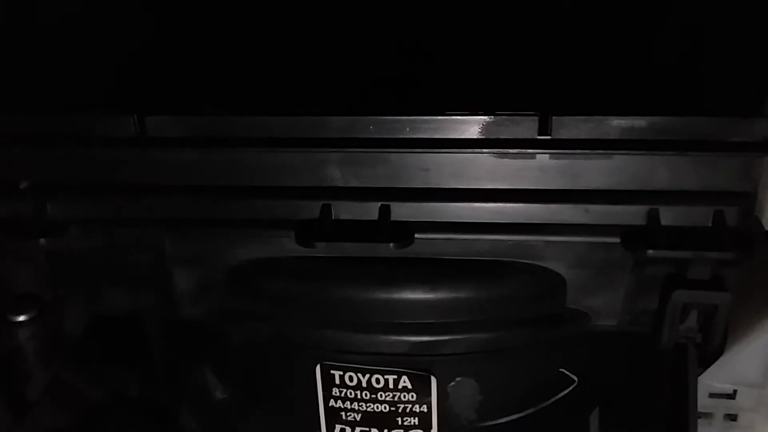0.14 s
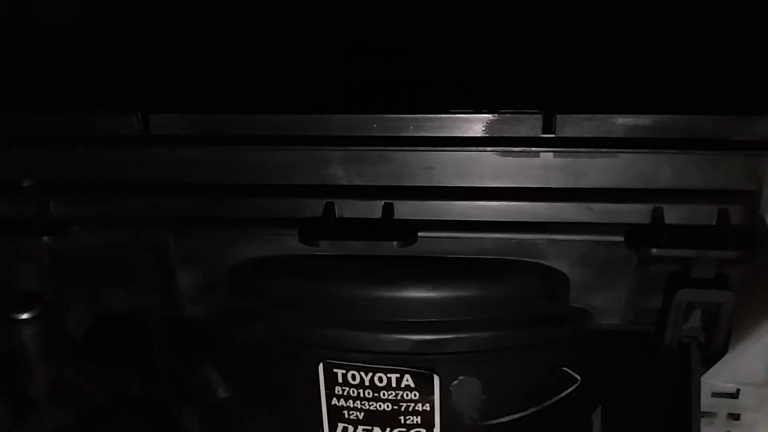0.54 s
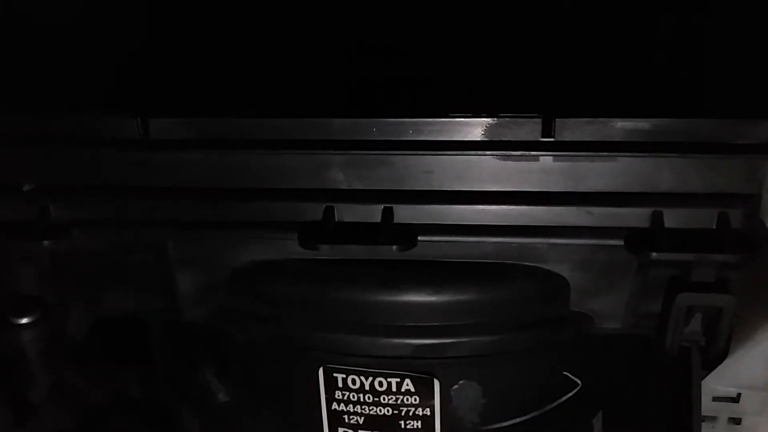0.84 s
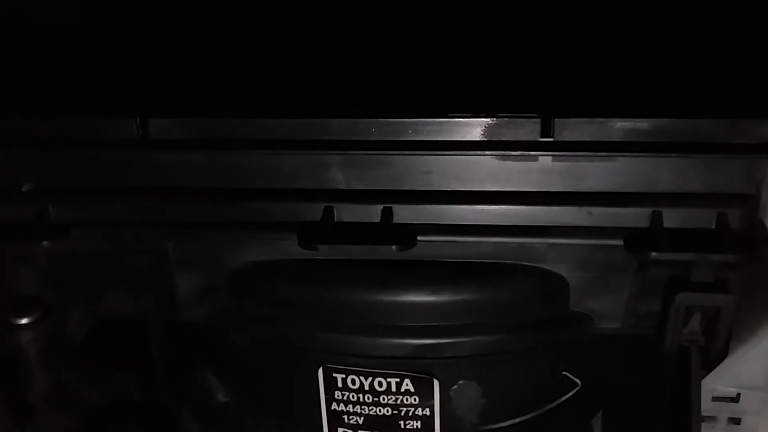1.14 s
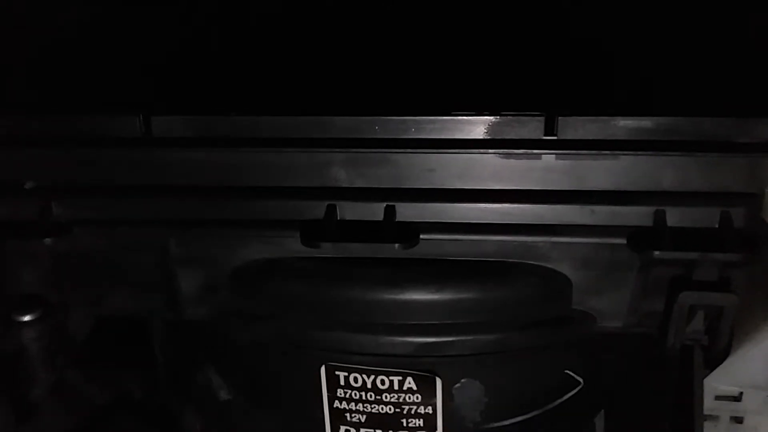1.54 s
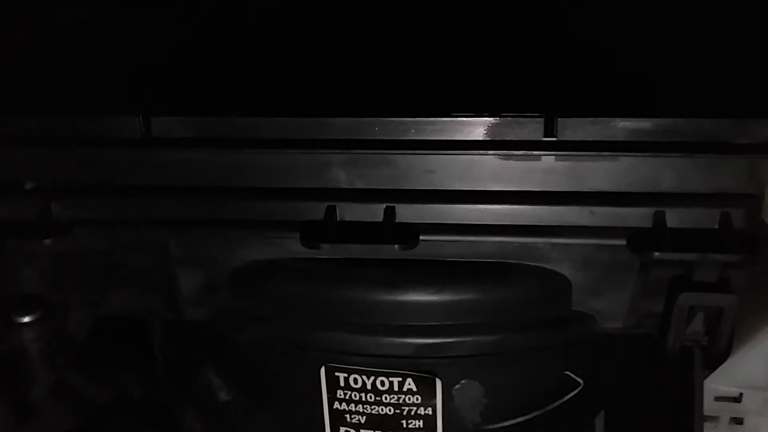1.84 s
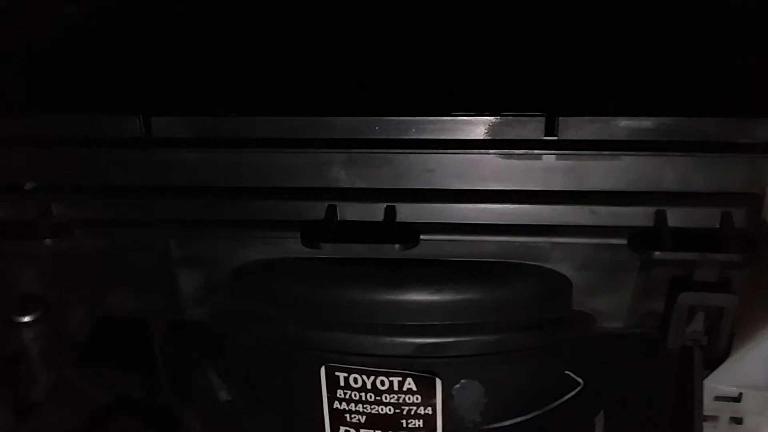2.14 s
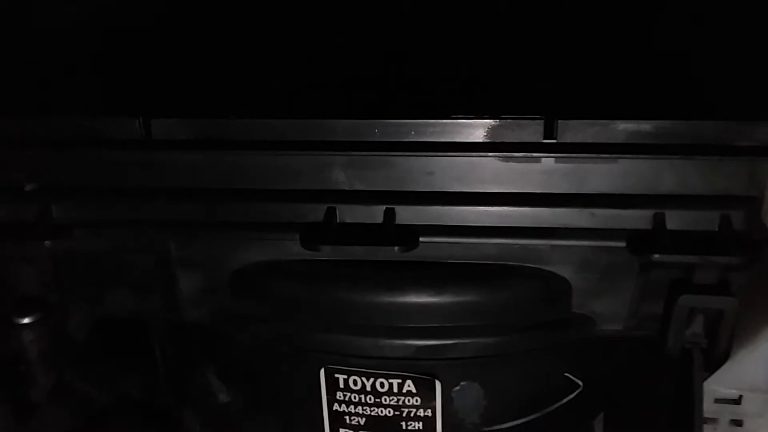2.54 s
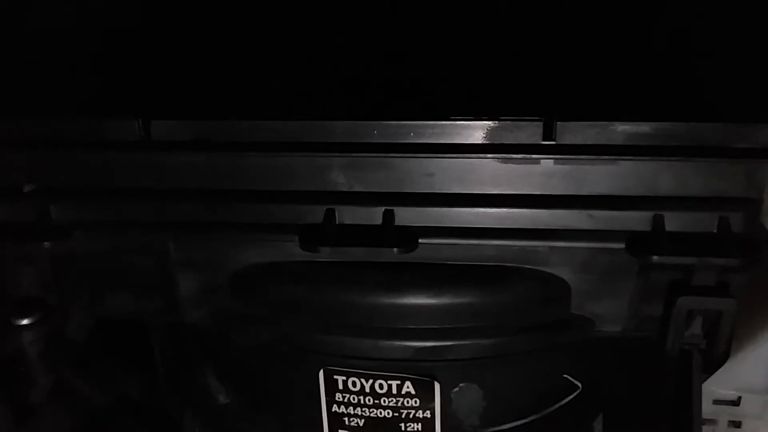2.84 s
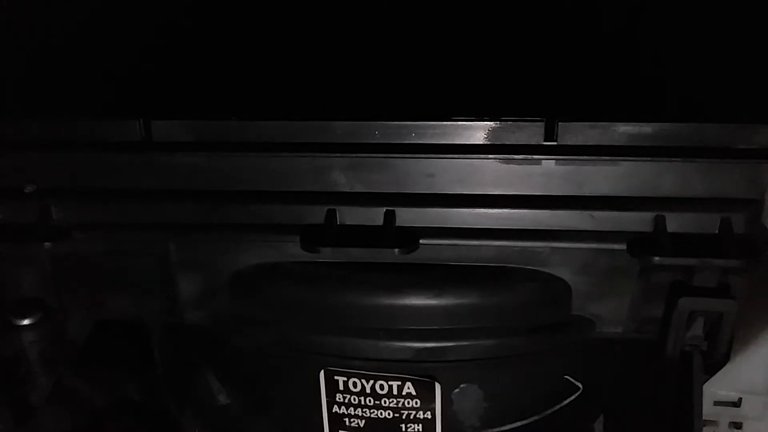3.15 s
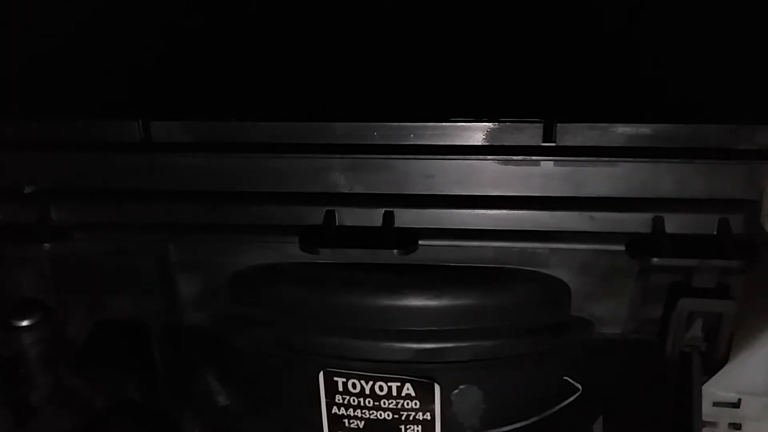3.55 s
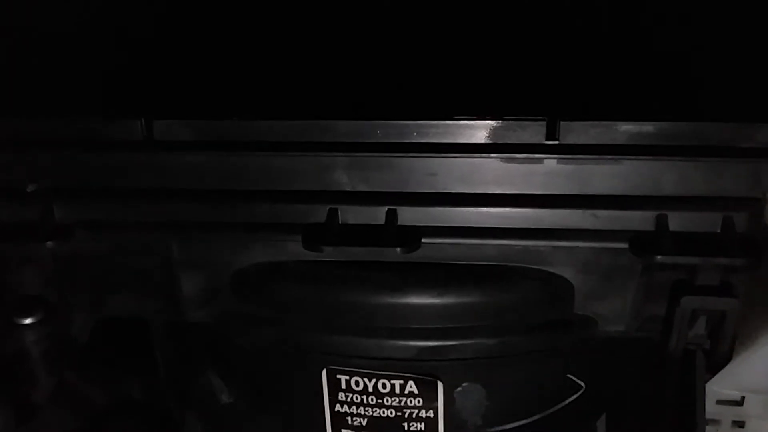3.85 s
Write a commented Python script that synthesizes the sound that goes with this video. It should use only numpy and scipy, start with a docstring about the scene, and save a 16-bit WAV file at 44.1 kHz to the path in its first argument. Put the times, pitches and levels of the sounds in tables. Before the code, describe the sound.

Close stereo pickup of a car fan motor in a tight plastic space: low hum and airy rush rise after a click, hold fast, then drop in steps with more clicks and a slight final pickup.

```python
"""A car's ventilation blower, heard from close by under the dashboard, slows to a medium speed.
A switch clicks and it speeds up to fast; later a click and a short squeak come as it drops back to medium.
More clicks follow as it sinks to slow, then picks up a little at the end.
All along, the rotor hums on multiples of its turning rate (sine waves), and air rushes through the wheel
and rings the plastic housing (filtered noise). Faint hiss lies underneath; a limiter turns peaks down."""
import sys
import numpy as np
from scipy import signal
from scipy.fft import rfft, irfft
from scipy.io import wavfile
from scipy.ndimage import uniform_filter1d, minimum_filter1d

SR = 44100
rng = np.random.default_rng(int(sys.argv[2]) if len(sys.argv) > 2 else 0)


def transcribe(signal):
    """Save signal, clipped to [-1, 1], as a 16-bit WAV file at the path in sys.argv[1]."""
    frames = np.atleast_2d(signal).T
    limited = np.clip(frames, -1, 1)
    pcm = np.round(limited * 32767).astype(np.int16)
    wavfile.write(sys.argv[1], SR, pcm)


N = 176400
T = np.arange(N) / SR  # time of each sample, s
F = np.maximum(np.fft.rfftfreq(N, 1 / SR), 1)  # frequencies used by the filters, Hz

# how fast the rotor turns: [t/s, turning rate/Hz]
ROTOR_SPEED = [(0.0, 44.2), (0.1, 38.5), (0.24, 36.7), (0.51, 35.8), (0.61, 44), (0.7, 48.2), (0.89, 48.9),
               (1.79, 49.1), (2.28, 48.2), (2.32, 48.4), (2.51, 38.2), (2.7, 35.8), (3.04, 35.3),
               (3.09, 33.7), (3.45, 22.8), (3.62, 20.3), (3.74, 26), (4.0, 28.1)]
# gains at each speed: [turning rate/Hz, hum gain/dB, air gain/dB, extra treble gain/dB]
SPEED_GAINS = [(21, -10, -12, -8.5), (26.11, -11, -9, -10), (29.9, -2.5, -6, -5), (34.4, 1, -3, -2.2),
               (50.6, 2, -1.72, 3)]
# slow swell of the whole blower: [t/s, gain/dB]
BLOWER_SWELL = [(0, 1.5), (.9, 0.28), (1.7, 0.34), (1.95, 2.6), (2.3, 2.5), (2.55, 1.5), (3.1, 0),
                (4, -1.5)]
# unsteady bass at each speed: [turning rate/Hz, extra rumble gain/dB, hum waver/dB]
BASS_UNSTEADINESS = [(21, 0, 3), (26, 0, 3), (30, -5, 1), (35.5, -6, .3), (49, -2, .3)]

# hum before the speed gains, one row per multiple of the turning rate, from the first up:
# [relative level at medium speed/dB, relative level at fast speed/dB]
HUM_MULTIPLES = [(-38, -22.5), (-17.3, -11.3), (-17.7, -20.3), (-31, -31), (-49, -43), (-33, -37),
                 (-37, -37), (-46, -42), (-53, -53), (-52, -47)]
MEDIUM_HZ, FAST_HZ = 36.5, 48.5  # turning rates
HUM_CUT_HZ, HUM_PAN_DB = 68.3, -1.67  # slightly to the right

# air rush before the speed gains: [f/Hz, left level per Hz/dB, right level per Hz/dB]
AIR_RUSH = [(25, -62, -64), (45.4, -60, -69), (67, -36, -44), (145, -51, -44.5), (208, -51, -48.5),
            (304, -53, -58), (482, -51.5, -52.5), (578, -57.5, -63), (744, -58.5, -58), (986, -54, -56),
            (1200, -59.5, -60), (1500, -53.5, -63.5), (2020, -58, -61), (2250, -60, -69.5),
            (3110, -66, -70.5), (4050, -61, -74), (4080, -66, -72.5), (4630, -62, -66.5),
            (5700, -69.5, -79.5), (6760, -74.5, -73.5), (6950, -79.5, -86), (7570, -82, -82),
            (8700, -90.5, -89.5), (12200, -95.5, -96), (13500, -102, -94.5), (15600, -102, -97)]
# housing resonances before the speed gains: [f/Hz, width/Hz, left relative level/dB, right relative level/dB]
HOUSING_RINGS = [(870, 47, -37.5, -39.5), (1122, 70, -35, -53), (1424.5, 67, -28.5, -42.5),
                 (1495, 96, -39.5, -51), (1908, 85, -37, -44.5), (2073, 41, -33, -63),
                 (2520, 56, -61.5, -44), (2910, 24, -54, -47), (5000, 300, -35, -52),
                 (6140, 60, -49.5, -57), (8040, 100, -57, -66)]
SHARED_BELOW_HZ, TREBLE_HZ, RUMBLE_HZ = 510, 2470, 123
FLUTTER_DB, TURN_PULSE = 0.5, 0.02  # random flutter; pulse depth as a fraction

# switch contacts, levels relative:
# [t/s, knock level/dB, panel ring level/dB, ring tilt/(dB per octave), tick level/dB]
CONTACTS = [(.391, -13.5, -26, 8, -21), (0.535, -14, -27, 0, -11), (.5385, 4, -0.5, 3, -11),
            (.5455, -14, -18, 5, -32), (2.331, -16, -20.5, 9, -13), (3.0606, -9, -16, 2.5, -10),
            (3.127, -23, -27, 5, -27), (3.1325, -17.5, -23.5, -11, -22), (3.5124, -36, -30, -6, -60),
            (3.592, -32, -33, -7, -58), (3.6235, -14.5, -16, -3.5, -17.5), (3.7844, -31, -46, -4, -60)]
# ringing of the switch and its panel: [f/Hz, relative level/dB, time to fall by 60 dB/s]
PANEL_MODES = [(1150, -11, .045), (1400, -15, .03), (1780, -4, .04), (1950, 0, .04), (2450, -3, .035),
               (2750, -5, .035), (4000, -11, .03), (4900, -9, .035), (6500, -16, .025)]
# tone of the noisy part of a knock: [f/Hz, relative level/dB]
KNOCK_TONE = [(300, -26), (750, -13), (1200, 0.5), (1850, 4.5), (2700, 1.5), (3500, -4.5), (5200, -4.5),
              (7000, -19), (10000, -35), (15500, -40)]
KNOCK_DB, KNOCK_T60_S = -1, 0.032  # added to every knock level; time to fall by 60 dB
TICK_DB, TICK_T60_S, TICK_HZ = -14, 0.027, 6000  # the same for ticks; bass falls away below TICK_HZ
ATTACK_S, CLICK_PAN_DB, TILT_PIVOT_HZ = 0.0024, 11.5, 2000  # to the left; tilt leaves the pivot unchanged
SQUEAK_S, SQUEAK_LENGTH_S = 2.3395, 0.0045  # centre; time from there to 1/e
SQUEAK_HZ, SQUEAK_WOBBLE_HZ, SQUEAK_DB = 4570, 130, -15.5  # level before panning

HISS_DB = -66
CEILING, LIMITER_S, TOP_HZ = 1.0, 0.028, 15800  # ceiling as a fraction of full scale


def hum(speed):
    """The unbalanced rotor shakes the housing on multiples of its turning rate; deep bass radiates poorly."""
    turn = 2 * np.pi * np.cumsum(speed) / SR
    fast = np.clip((speed - MEDIUM_HZ) / (FAST_HZ - MEDIUM_HZ), 0, 1)
    tones = 0
    for multiple, (medium_db, fast_db) in enumerate(HUM_MULTIPLES, 1):
        # only the lowest three multiples waver
        waver_db = curve(speed, BASS_UNSTEADINESS, axis=2) if multiple < 4 else 0
        level_db = medium_db + fast * (fast_db - medium_db) + waver_db * walk(4)
        tones = tones + undb(level_db) * np.sin(multiple * turn)
    bass_cut = signal.butter(4, HUM_CUT_HZ, "high", fs=SR, output="sos")
    tones = signal.sosfilt(bass_cut, tones)
    return tones * undb(curve(speed, SPEED_GAINS, axis=1)) * pan(HUM_PAN_DB)


def air(speed):
    """Turbulence and housing resonances, louder and brighter at fast speed, pulsing slightly once a turn."""
    # low frequencies are mostly the same on both sides, high ones differ
    shared = 0.9 / (1 + (F / SHARED_BELOW_HZ) ** 4)
    stream = shape(rng.standard_normal(N), np.sqrt(shared)) + shape(noise(), np.sqrt(1 - shared))
    rush_gain = np.array([colour(AIR_RUSH, axis=1), colour(AIR_RUSH, axis=2)])
    sound = shape(stream, rush_gain) * np.sqrt(SR / 2)  # makes the table's levels per Hz
    for hz, width, left_db, right_db in HOUSING_RINGS:
        resonance = 1 / (1 + (2 * (F - hz) / width) ** 2)
        sound = sound + undb([[left_db], [right_db]]) * unit(shape(noise(), resonance))

    treble = shape(sound, F ** 2 / (F ** 2 + TREBLE_HZ ** 2))
    rumble = shape(sound, 1 / (1 + (F / RUMBLE_HZ) ** 4))
    # minus 1, because the sound already holds one share of each
    extra_treble = treble * (undb(curve(speed, SPEED_GAINS, axis=3)) - 1)
    extra_rumble = rumble * (undb(curve(speed, BASS_UNSTEADINESS, axis=1)) - 1)
    sound = sound + extra_treble + extra_rumble

    pulse = 1 + TURN_PULSE * np.cos(2 * np.pi * np.cumsum(speed) / SR)
    gain_db = curve(speed, SPEED_GAINS, axis=2) + FLUTTER_DB * walk(26)
    return sound * pulse * undb(gain_db)


def switch():
    """Each contact gives a bright tick and a short plastic knock that rings the panel; one slip squeaks."""
    knock_noise = unit(shape(noise(), colour(KNOCK_TONE)))
    tick_gain = F ** 2 / (F ** 2 + TICK_HZ ** 2) / (1 + (F / 13000) ** 4)
    tick_noise = unit(shape(noise(), tick_gain))
    clicks = np.zeros((2, N))
    for start, knock_db, ring_db, tilt_db, tick_db in CONTACTS:
        first = int(start * SR)
        span = slice(first, first + SR // 10)
        age = T[:len(T[span])]
        knock = undb(knock_db + KNOCK_DB) * knock_noise[:, span] * fade(age, KNOCK_T60_S)
        ring = undb(ring_db) * panel_ring(age, tilt_db)
        tick = undb(tick_db + TICK_DB) * tick_noise[:, span] * fade(age, TICK_T60_S)
        attack = np.minimum(age / ATTACK_S, 1)
        clicks[:, span] += attack * (knock + ring + tick)
    return (clicks + squeak()) * pan(CLICK_PAN_DB)


def panel_ring(age, tilt_db):
    """The switch and panel ring as dying sine waves, with random starting phases on each side."""
    ring = 0
    for hz, level_db, t60 in PANEL_MODES:
        phase = rng.uniform(0, 2 * np.pi, (2, 1))
        level = undb(level_db + tilt_db * np.log2(hz / TILT_PIVOT_HZ))
        ring = ring + level * fade(age, t60) * np.sin(2 * np.pi * hz * age + phase)
    return ring


def squeak():
    """The switch squeaks once as it leaves the fast position: a short tone with a wobbling pitch."""
    pitch = SQUEAK_HZ + SQUEAK_WOBBLE_HZ * walk(371)
    swell = np.exp(-((T - SQUEAK_S) / SQUEAK_LENGTH_S) ** 2)
    return undb(SQUEAK_DB) * swell * np.sin(2 * np.pi * np.cumsum(pitch) / SR)


def hiss():
    """The microphones hiss faintly: steady white noise, unrelated left and right."""
    return undb(HISS_DB) * noise()


def undb(db):
    """Turn decibels into a plain gain."""
    return 10 ** (np.asarray(db) / 20)


def curve(at, table, axis=1):
    """Read one column of a table, joined by straight lines."""
    table = np.array(table)
    return np.interp(at, table[:, 0], table[:, axis])


def colour(table, axis=1):
    """Gain at each frequency from (Hz, dB) points, joined on a logarithmic frequency scale."""
    table = np.array(table)
    return undb(np.interp(np.log(F), np.log(table[:, 0]), table[:, axis]))


def shape(x, gain):
    """Filter a sound by a gain at each frequency."""
    return irfft(rfft(x) * gain, N)


def unit(x):
    """Scale to a spread of 1."""
    return x / np.std(x, axis=-1, keepdims=True)


def noise():
    """Unrelated white noise, left and right."""
    return rng.standard_normal((2, N))


def walk(rate):
    """Smooth random wander with spread 1, mostly slower than the rate in Hz."""
    return unit(shape(rng.standard_normal(N), 1 / (1 + (F / rate) ** 4)))


def fade(age, t60):
    """Die away by 60 dB in t60 seconds."""
    return np.exp(-np.log(1000) * age / t60)


def pan(db):
    """Left and right gains; the left is louder by this many dB."""
    return undb(np.array([[db], [-db]]) / 2)


def scene():
    """Hum and air follow the rotor's speed; the switch clicks and the hiss are added."""
    speed = curve(T, ROTOR_SPEED)
    blower = (hum(speed) + air(speed)) * undb(curve(T, BLOWER_SWELL))
    return blower + switch() + hiss()


def record(dry):
    """A look-ahead limiter turns the sound down around peaks; then the very top is cut."""
    size = int(LIMITER_S * SR)
    peak = np.abs(dry).max(axis=0)
    gain = np.minimum(1, CEILING / (peak + 1e-9))
    # hold the lowest gain around each peak, then smooth it
    limited = dry * uniform_filter1d(minimum_filter1d(gain, size), size)
    top_cut = signal.ellip(10, 0.1, 80, TOP_HZ, fs=SR, output="sos")
    return signal.sosfilt(top_cut, limited)


dry = scene()
out = record(dry)
transcribe(out)
```